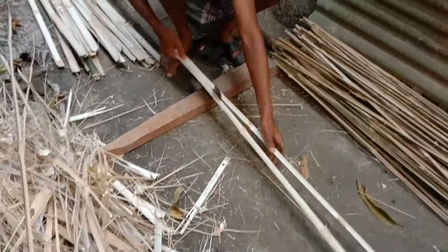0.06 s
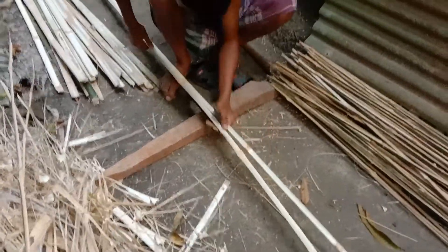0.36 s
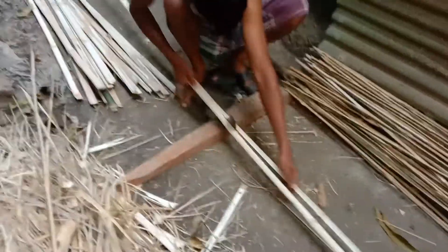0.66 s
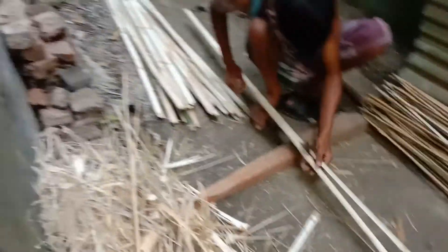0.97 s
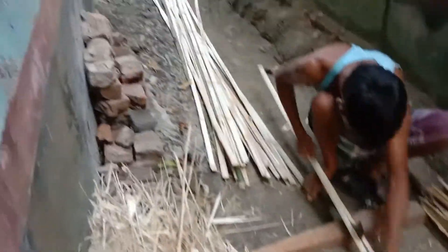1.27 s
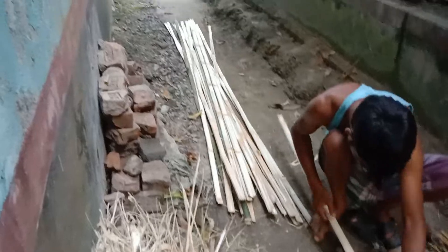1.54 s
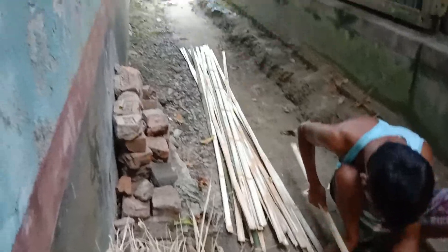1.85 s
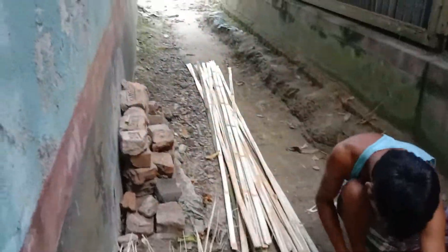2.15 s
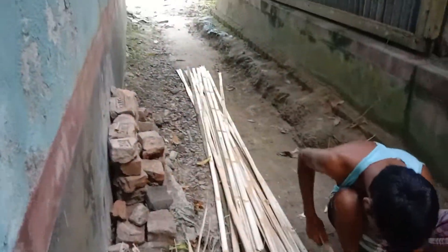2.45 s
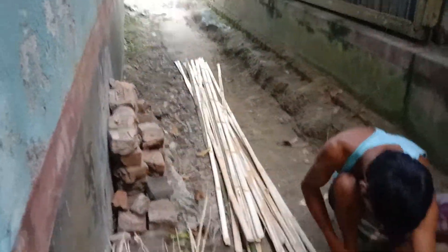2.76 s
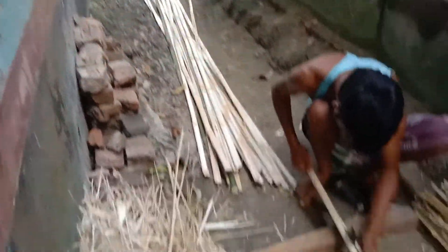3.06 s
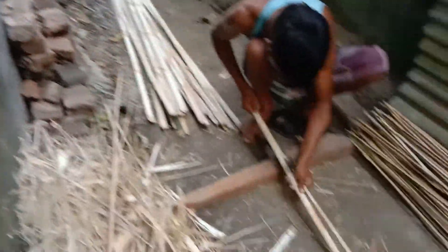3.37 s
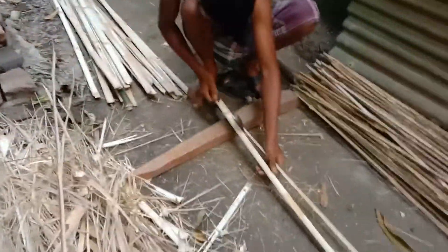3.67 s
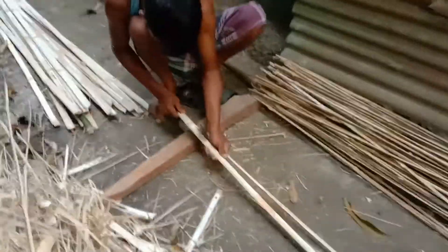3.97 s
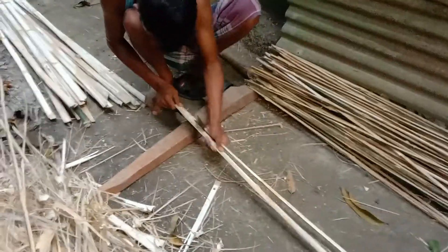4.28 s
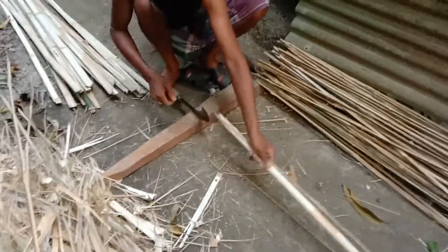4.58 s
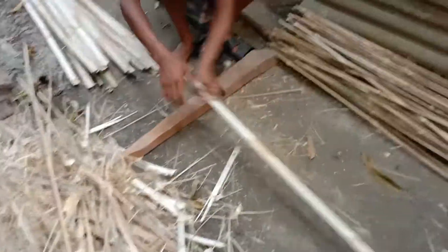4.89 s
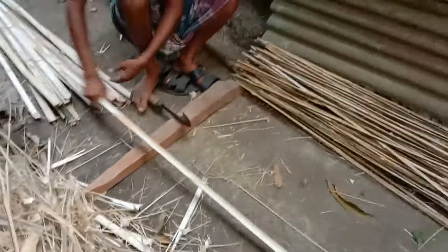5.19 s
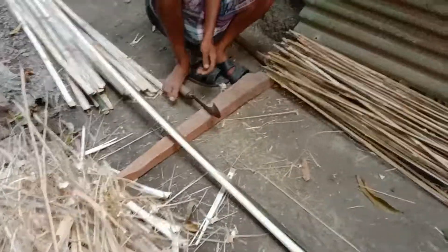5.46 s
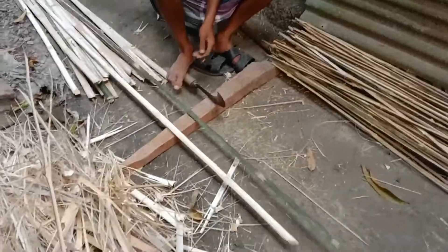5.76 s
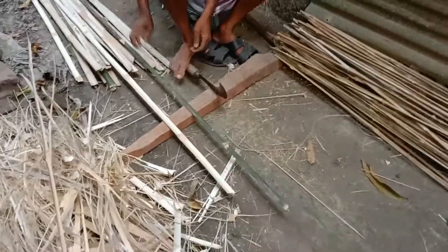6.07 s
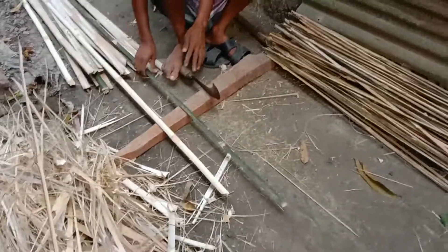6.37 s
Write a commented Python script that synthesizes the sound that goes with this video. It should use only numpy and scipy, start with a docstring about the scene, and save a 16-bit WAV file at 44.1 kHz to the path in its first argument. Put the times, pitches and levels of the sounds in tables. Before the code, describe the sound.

Close to the microphone, a bamboo strip is pulled over a fixed blade in eight uneven strokes, rubbing and squealing faintly as its fibres tear and snap. It is then tossed onto a pile and the next strip is dragged out, clacking and knocking on the ground. Further off in the walled yard chicks peep and another bird whistles briefly. Distant insects shrill throughout, and a faint low hum joins in the second half.

```python
"""A bamboo strip is pulled over a fixed blade in eight strokes, close to the microphone: it rubs,
sings faintly, and its fibres tear and snap. It is tossed onto a pile, and the next strip is dragged
out, knocking and clattering on the ground. Further off in the walled yard chicks peep and a second
bird whistles. Far insects shrill throughout, and a low hum comes up in the second half."""
import sys
import numpy as np
from scipy import signal
from scipy.fft import rfft, irfft
from scipy.io import wavfile
from scipy.ndimage import uniform_filter1d

SR = 44100
rng = np.random.default_rng(int(sys.argv[2]) if len(sys.argv) > 2 else 0)


def transcribe(signal):
    """Save signal, clipped to [-1, 1], as a 16-bit WAV file at the path in sys.argv[1]."""
    frames = np.atleast_2d(signal).T
    limited = np.clip(frames, -1, 1)
    pcm = np.round(limited * 32767).astype(np.int16)
    wavfile.write(sys.argv[1], SR, pcm)


N = 292383
TIME = np.arange(N) / SR


def amp(db):
    """Decibels to gain."""
    return 10 ** (np.asarray(db) / 20)


def unit(x):
    """Scales to rms 1."""
    return x / np.sqrt(np.mean(x ** 2) + 1e-20)


def read(points, hz):
    """A spectrum read on a log-frequency axis."""
    f, value = np.transpose(points)
    return np.interp(np.log(hz + 1), np.log(f + 1), value)


def add(mix, start, sound):
    """Mixes a sound in at a start in seconds."""
    part = mix[max(round(start * SR), 0):][:len(sound)]
    part += sound[:len(part)]


def colour(x, points):
    """Gives a steady sound a spectrum, at rms 1."""
    return unit(irfft(rfft(x) * amp(read(points, np.fft.rfftfreq(len(x), 1 / SR))), len(x)))


def swell(t, start, hold, rise, fall):
    """Attack, hold and release as a gain; rise and fall are the seconds for 20 dB."""
    below = np.maximum(start - t, 0) / rise + np.maximum(t - start - hold, 0) / fall
    return amp(-20 * np.minimum(below, 10))


def resonate(x, hz, width):
    """A resonance of gain 1 that can follow a pitch curve."""
    r = np.exp(-np.pi * width / SR)
    if np.ndim(hz) == 0:
        c = r * np.cos(2 * np.pi * hz / SR)
        return 2 * (1 - r) * signal.lfilter([1, -c], [1, -2 * c, r * r], x)
    turn = np.exp(2j * np.pi * np.cumsum(hz) / SR)
    return 2 * (turn * signal.lfilter([1 - r], [1, -r], x / turn + 1e-18)).real


def slips(per_s, spread_db, smooth):
    """Stick-slip: tiny clicks of very unequal size over smooth friction."""
    clicks = amp(spread_db * np.minimum(rng.exponential(1, N), 4)) * rng.choice([-1, 1], N)
    return unit(clicks * (rng.random(N) < per_s / SR)) + smooth * rng.standard_normal(N)


def patchy(x, frames, bins, depth_db=5):
    """Resonances come and go as the contact point travels along the strip."""
    spectra = signal.stft(x, nperseg=1024, noverlap=768)[2]
    patches = uniform_filter1d(rng.standard_normal(spectra.shape), bins, axis=0)
    patches = unit(uniform_filter1d(patches, frames, axis=1))
    return signal.istft(spectra * amp(depth_db * patches), nperseg=1024, noverlap=768)[1][:N]


# The blade bites. Each row: start, hold, rise and fall in seconds, then rub, fizz and drag in dB.
CUTS = [(0, 0.069, .02, 0.18, -36.5, -36, -69), (.578, 0.13, 0.028, 0.19, -35.5, -30.5, -60),
        (1.309, 0.16, 0.084, 0.12, -33.5, -29.5, -64), (1.986, 0.19, 0.025, 0.14, -32.5, -30.5, -42),
        (2.696, 0.072, 0.027, 0.3, -36, -30.5, -65.5), (3.554, 0.036, 0.15, 0.079, -38.5, -29, -68),
        (4.147, 0.023, 0.075, .13, -39.5, -30.5, -54), (4.449, 0.052, 0.027, .12, -33, -28, -47.5)]
# The strip slides uncut. Each row: start and hold in seconds, then rub, fizz and drag in dB.
SLIDES = [(0.43, 0.15, -43, -52, -66.5), (1.02, 0.23, -44.5, -51, -83), (1.532, 0.44, -40, -47, -63.5),
          (2.287, 0.27, -39.5, -49.5, -55.5), (2.9, 0.31, -69, -49, -66), (3.423, 0.071, -63, -38.5, -65.5),
          (3.771, 0.065, -40.5, -45, -57.5), (3.974, 0.081, -45, -58, -63), (4.247, 0.19, -60.5, -40, -72),
          (4.54, .15, -38, -58, -54.5), (5.115, .18, -45.5, -70, -64), (5.32, 0.23, -44, -67, -67.5),
          (5.59, 0.12, -50, -71, -76), (5.823, 0.18, -33.5, -71, -47), (6.098, 0.033, -43, -75, -64),
          (6.4, 0.047, -48.5, -83, -59)]
# Modes of a long strip. Each row: frequency and width in Hz, level in dB.
STRIP_MODES = [(1125, 18, 4.5), (1230, 33, -22), (1454, 17, -20), (1860, 35, -11), (2090, 30, -14),
               (2260, 24, 3), (2420, 70, 3.5), (2980, 44, 8), (3330, 64, 12.5), (3645, 95, 8)]
# Spectra of the rub, the tearing fizz and the dragging end. Each row: frequency in Hz, level in dB.
RUB_SPECTRUM = [(500, -42), (950, -17), (1400, 2), (2100, 3), (2500, 2), (3300, 2.5), (3750, 0.5),
                (4200, -15), (4700, 5.5), (5400, 7), (6500, 4), (7800, -17), (10500, -37), (13000, -60)]
FIZZ_SPECTRUM = [(1500, -32), (3300, -27), (4300, -19), (5200, -1), (6700, 12.5), (7900, -4), (10000, -2),
                 (11300, -4), (13000, 1.5), (15000, 5.5), (16000, -11)]
DRAG_SPECTRUM = [(30, -38), (110, -14.5), (180, -2.5), (280, 5), (450, -8.5), (700, -1.5), (1200, -3.5),
                 (3000, -57)]
def scraping(bright_hz=2700, firm_db=-37):
    """At the microphone, slips ring the strip and tearing fibres fizz; its far end drags on earth."""
    t = TIME[::64]
    moves = list(CUTS) + [(start, hold, 0.13, 0.18, *db) for start, hold, *db in SLIDES]
    power = sum(np.outer(amp(db), swell(t, start, hold, rise, fall)) ** 2
                for start, hold, rise, fall, *db in moves)
    rub_gain, fizz_gain, drag_gain = [np.interp(TIME, t, gain) for gain in np.sqrt(power)]
    grip = slips(per_s=1400, spread_db=3, smooth=0.76)
    ringing = unit(sum(amp(db) * resonate(grip, hz, width) for hz, width, db in STRIP_MODES))
    ring_db = np.interp(TIME, [3.6, 4.4, 5.0, 5.8], [-14.5, -32, -4, -3.5])  # most when held loosely
    rub = patchy(colour(grip, RUB_SPECTRUM), frames=16, bins=3) * amp(2.5) + ringing * amp(ring_db)
    dull = signal.sosfiltfilt(signal.butter(3, bright_hz, fs=SR, output="sos"), rub)
    brightness = np.minimum(rub_gain / amp(firm_db), 1) ** 0.18  # a light touch is duller
    rub = dull + (rub - dull) * brightness
    fizz = colour(slips(per_s=650, spread_db=4.5, smooth=1), FIZZ_SPECTRUM)
    drag = colour(slips(per_s=800, spread_db=7, smooth=1), DRAG_SPECTRUM)
    return rub * rub_gain + fizz * fizz_gain + patchy(drag, frames=14, bins=2) * drag_gain


# Spectra of the insects and the still air. Each row: frequency in Hz, level in dB.
INSECT_SPECTRUM = [(3900, -53), (4300, -23), (4800, 3.5), (5500, 4.5), (6400, 6), (7000, -4.5), (7700, -24),
                   (10300, -16), (11500, -40)]
AIR_SPECTRUM = [(20, -15), (45, -11), (90, -0.5), (200, -5), (500, -13.5), (1500, -19), (4300, -35),
                (5000, -3), (8000, 0), (10300, -5.5), (11500, -41), (16000, -40)]
# The chorus swells twice. Each row: time in seconds, level in dB.
CHORUS_LEVELS = [(0, -41.5), (1.3, -42.5), (2.5, -35.5), (3.2, -35.5), (4.0, -39.5), (4.75, -32.5),
                 (5.4, -30), (6.63, -33.5)]
def insects_and_air():
    """Far from the microphone, many insects merge into one shrill band above the still air."""
    chorus_db = np.interp(TIME, *np.transpose(CHORUS_LEVELS))
    insects = colour(rng.standard_normal(N), INSECT_SPECTRUM) * amp(chorus_db)
    return insects + colour(rng.standard_normal(N), AIR_SPECTRUM) * amp(-50.5)


CRACK_HZ = np.fft.rfftfreq(1024, 1 / SR)
def causal(gain_db, size=1024):
    """The sharpest impulse response that has these band gains."""
    cepstrum = irfft(np.log(amp(gain_db)))
    cepstrum[1:size // 2] *= 2
    cepstrum[size // 2 + 1:] = 0
    return irfft(np.exp(rfft(cepstrum)))


def crack(gain_db, t60, rattle_db, rattle_t60, rise):
    """A spike of splintering, then a weaker rattle of the strip; peak about 1."""
    t = np.arange(4096) / SR
    spike = amp(-60 * np.maximum(t - rise, 0) / t60)
    rattle = amp(rattle_db - 60 * t / rattle_t60)
    burst = rng.choice([-1, 1], len(t)) * (spike + rattle) * np.minimum(t / rise, 1) ** 2
    sound = signal.fftconvolve(burst, causal(gain_db))
    return sound / np.sqrt(uniform_filter1d(sound ** 2, size=64).max()) / 2


def small_snaps(per_s=55, most=32):
    """Lesser fibres give way at random while the blade bites; rows as in LOUD_SNAPS."""
    rows = []
    for start, hold, _, _, _, fizz_db, _ in CUTS:
        timing, strength = rng.random((most, 2)).T
        delays = (np.arange(most) + timing) / per_s
        levels = fizz_db + 14 + strength
        rows += [(start + delay, db, -20.5) for delay, db in zip(delays, levels) if delay < hold]
    return rows


# The loudest fibres breaking. Each row: start in seconds, level and woody body in relative dB.
LOUD_SNAPS = [(.576, -7, -28), (.587, -6, -13.5), (.612, -4.5, -24), (.634, -4, -13), (.667, -2.5, -30),
              (.7, -10.5, -12), (1.403, -2, -9.5), (1.468, -2, -24), (1.985, -1, -6), (1.995, -9, -32),
              (2.245, -11.5, -21), (2.666, -13, -10), (2.688, 0, -33), (2.711, -1, -22), (3.571, -5, -24),
              (4.144, -2.5, -7.5), (4.478, -4.5, -21)]
def snaps():
    """Fibres break at the blade with a bright crack, close to the microphone."""
    out = np.zeros(N)
    tilt_db = read([(500, -12), (1100, 2.5), (7000, 1.5), (9500, 0)], CRACK_HZ)
    body = read([(3600, 0.76), (5000, 0.21)], CRACK_HZ)
    for start, db, body_db in list(LOUD_SNAPS) + small_snaps():
        add(out, start, amp(db - 2) * fibre_snap(tilt_db + body * (body_db + 18)))
    return out


# Spectrum of a breaking fibre. Each row: frequency in Hz, level in dB.
SNAP_SPECTRUM = [(120, -73), (200, -41), (401, -13), (806, -13), (1080, -4.5), (1530, -14.5), (2250, -16),
                 (2510, -13), (2960, -5), (4040, -10), (5420, 2.5), (7010, -2.5), (8420, -16), (14900, 0.5),
                 (16000, -11.5)]
def fibre_snap(tint_db):
    """One fibre splinters and leaves the strip rattling."""
    spectrum = read(SNAP_SPECTRUM, CRACK_HZ) + tint_db
    return crack(spectrum, t60=0.0065, rattle_db=-4.5, rattle_t60=0.095, rise=0.0017)


def slip_tone(samples, hz, width, harmonics):
    """A short tone whose pitch wanders, fading in and out."""
    wander = np.sqrt(2 * np.pi * width / SR) * rng.standard_normal(samples)
    phase = np.cumsum(2 * np.pi * hz / SR + wander)
    tone = unit(sum(unit(resonate(np.sin(k * phase), k * hz, 50)) for k in harmonics))
    return tone * signal.windows.tukey(samples, 0.4)


# Squeals and groans. Each row: start and end in seconds, pitch and width in Hz, level in dB.
SQUEALS = [(0.0193, 0.224, 2250, 110, -48.5), (.585, .74, 560, 143, -48.5), (1.48, 1.61, 230, 52, -53),
           (3.24, 3.39, 310, 48, -55), (1.286, 1.63, 993, 5.8, -36.5), (1.1, 1.523, 1386, 14, -45.5),
           (2.24, 2.444, 846, 66, -41.5), (2.461, 2.67, 550, 13, -53.5), (3.5, 4.405, 2270, 51, -55.5),
           (4.436, 4.518, 1083, 32, -36.5), (4.431, 4.547, 2966, 18, -35), (4.413, 4.59, 670, 47, -49),
           (4.583, 4.76, 3280, 7.5, -40.5)]
def squeals():
    """Close by, the strip squeals or groans where it slips evenly."""
    out = np.zeros(N)
    for start, end, hz, width, db in SQUEALS:
        add(out, start, amp(db) * slip_tone(int((end - start) * SR), hz, width, harmonics=[1]))
    add(out, 6, amp(-47) * slip_tone(64, hz=443, width=2, harmonics=range(2, 6)))  # one faint tick
    return out


def peep(length, first_hz, last_hz):
    """A slightly hoarse whistle that slides down and levels out."""
    progress = np.linspace(0, 1, int(length * SR))
    waver = 1 + 0.01 * unit(uniform_filter1d(rng.standard_normal(len(progress)), size=50))
    glide = np.interp(progress, [0, 0.25, 0.6, 0.8, 1], [0, 0.25, 0.68, 0.92, 1])
    hz = (first_hz + (last_hz - first_hz) * glide) * waver
    throat_db = read([(3100, 1), (4100, -2), (4900, 3), (5900, 7)], hz)
    return amp(throat_db) * signal.windows.tukey(len(hz), 0.25) * np.sin(2 * np.pi * np.cumsum(hz) / SR)


# Chick calls. Each row: start and length in seconds, last pitch in Hz, level in relative dB.
PEEPS = [(0.235, .112, 2700, -41), (0.456, 0.073, 3310, -43.5), (0.901, 0.068, 3200, -47),
         (1.031, 0.083, 3090, -45.5), (1.187, 0.071, 3200, -42), (1.489, .064, 3250, -43),
         (1.649, 0.065, 3270, -43), (1.844, 0.097, 3370, -38.5), (2.312, 0.065, 3260, -43),
         (2.52, .072, 3130, -44), (2.833, 0.057, 3320, -39), (2.972, .062, 3180, -42),
         (3.122, 0.069, 3050, -41), (3.288, 0.085, 2960, -41), (3.456, .082, 3160, -38),
         (3.682, 0.097, 3390, -38), (3.923, 0.061, 3310, -49.5)]
def chicks(first_hz=6060):
    """Further off in the yard, the chicks repeat one falling peep."""
    out = np.zeros(N)
    for start, length, last_hz, db in PEEPS:
        add(out, start, amp(db) * peep(length, first_hz, last_hz))
    return out


# Long slides. Each row: start, hold, rise and fall in seconds, first pitch in Hz, first level in dB.
HOLLOW_NOTES = [(0.396, 0.31, 0.059, 0.11, 1210, -40.5), (0.998, 2.84, 0.25, 0.83, 1450, -41)]
def hollow_notes(rest_hz=1071, sink_s=0.39, fade_db_per_s=1.57):
    """A long slide sounds a hollow note close by, sinking as the strip settles."""
    out = np.zeros(N)
    for start, hold, rise, fall, first_hz, db in HOLLOW_NOTES:
        age = np.maximum(TIME - start, 0)
        hz = rest_hz + (first_hz - rest_hz) * np.exp(-age / sink_s)
        note = unit(resonate(resonate(rng.standard_normal(N), hz, 166), hz, 230))
        out += note * swell(TIME, start, hold, rise, fall) * amp(db - fade_db_per_s * age)
    return out


def hum():
    """A low hum swells in the background, then stays on more quietly."""
    crest = amp(-57.5) * swell(TIME, start=4, hold=0.74, rise=0.8, fall=0.6)
    steady = amp(-64) * swell(TIME, start=4, hold=N / SR, rise=0.8, fall=0.6)
    drone = unit(resonate(resonate(rng.standard_normal(N), 93.3, 6.6), 78, 60))
    return drone * np.maximum(crest, steady)


# Spectrum of strip striking strip. Each row: frequency in Hz, level in dB.
CLACK_SPECTRUM = [(150, -103), (250, -19.5), (589, -18.5), (1480, -5.5), (1700, -8), (2440, -4),
                  (2950, 0.5), (3320, -3), (3940, -14), (4220, -8.5), (5550, -0.5), (6260, -6.5),
                  (8100, -34.5), (11600, -38.5), (15000, -75)]
# Strikes. Each row: start in seconds, level, woody body and brittle top in relative dB, ring in seconds.
CLACKS = [(3.794, -6.5, -6, -52, 0.0053), (4.815, -12, -27, -36, 0.011), (4.983, -8, -44, -28, 0.0072),
          (5.327, -16, -24.5, -42.5, 0.11), (5.462, -20.5, -30, -45, .05),
          (5.7869, -0.5, -24.5, -38, 0.037), (5.825, -5, -23, -41, .009), (5.835, -3.5, -24, -50, 0.04),
          (5.9156, -7, -35, -58, 0.0083), (5.934, -6, -28, -54, 0.0064), (5.939, -2.5, -31, -69, 0.022),
          (6.062, -16, -36, -40, .006), (6.106, -11, -32, -51, .017), (6.119, -9, -30.5, -50, 0.0034),
          (6.338, -17.5, -32, -54, 0.027), (6.4659, -12.5, -12.5, -30, 0.014),
          (6.531, -16.5, -39, -57, 0.018)]
def clacks():
    """Strips clack on each other at the nearby pile, hard tips brighter than flat sides."""
    out = np.zeros(N)
    body = read([(1900, 1), (3000, 0.056)], CRACK_HZ)
    top = read([(7000, 0), (9500, 1)], CRACK_HZ)
    for start, db, body_db, top_db, ring in CLACKS:
        spectrum = read(CLACK_SPECTRUM, CRACK_HZ) + body * (body_db + 19.5) + top * (top_db + 44)
        clack = crack(spectrum, t60=ring, rattle_db=-14, rattle_t60=0.072, rise=0.00071)
        add(out, start, amp(db - 1.5) * clack)
    return out


def swing(t, hz, sink_cycles, loss_db, rest_share=0.072, rise_cycles=0.93):
    """Quick bending waves arrive before slow ones: swings of falling pitch, strongest at t = 0."""
    sinking = sink_cycles * np.log(np.maximum(1 + t * hz / sink_cycles, 1e-3))
    turns = rest_share * hz * t + (1 - rest_share) * sinking
    onset = np.exp(-(np.minimum(turns, 0) / rise_cycles) ** 2)
    return np.cos(2 * np.pi * turns) * onset * amp(-loss_db * np.maximum(turns, 0) ** 1.28)


# Dull blows. Each row: time in seconds, peak in dB, pitch in Hz, swings for the pitch to sink to
# about 1/e, loss in the first swing in dB, grit in dB against the peak.
KNOCKS = [(3.83, -20, 600, 1.6, 3.5, -5), (4.047, -28.5, 145, 3, 3, -7), (4.816, -23.5, 990, 2.2, 9, -6),
          (5.07, -21, 564, 1.9, 4, -1.5), (5.162, -16.5, 406, 1.37, 8.5, -13),
          (5.762, -10.5, 636, 1.1, 5, -16), (5.989, -10, 565, 0.86, 11, -19),
          (6.48, -14, 740, 1.25, 9.5, -15), (6.6085, -4, 910, 1.2, 8.5, -15.5)]
def knocks(lead_s=0.01, grit_t60=0.066):
    """Close by, heavily damped dull blows, each with a scuff of grit."""
    out, t = np.zeros(N), np.arange(SR // 8) / SR
    for start, db, hz, sink_cycles, loss_db, grit_db in KNOCKS:
        grit = rng.standard_normal(len(t)) * amp(-60 * t / grit_t60)
        band = signal.butter(1, [hz / 2, hz * 2], "bandpass", fs=SR, output="sos")
        scuff = signal.sosfilt(band, signal.sosfilt(band, grit))
        add(out, start, amp(db + grit_db) * scuff / abs(scuff).max())
        add(out, start - lead_s, amp(db) * swing(t - lead_s, hz, sink_cycles, loss_db))
    return out


# Bird calls. Each row: start and length in seconds, first pitch in Hz, level in relative dB.
WHISTLES = [(4.207, 0.027, 4860, -41), (5.134, 0.12, 5610, -38), (5.382, 0.057, 4860, -37)]
def second_bird(sag_hz_per_s=6500):
    """Away from the microphone, another bird whistles on a flatter note."""
    out = np.zeros(N)
    for start, length, hz, db in WHISTLES:
        add(out, start, amp(db) * peep(length, hz, hz - sag_hz_per_s * length))
    return out


# Spectrum of smooth bamboo skin sliding on skin. Each row: frequency in Hz, level in dB.
SWISH_SPECTRUM = [(1000, -40), (1400, -3), (2500, -4), (3500, -4), (4200, -24), (7000, -6), (9500, 4),
                  (11500, -5), (15000, -20)]
def swish():
    """The next strip slides out of the nearby pile with one dry hiss."""
    # The negative hold overlaps rise and fall, which lowers the crest.
    gain = amp(-44) * swell(TIME, start=5.5, hold=-0.16, rise=0.18, fall=0.3)
    return gain * colour(rng.standard_normal(N), SWISH_SPECTRUM)


# Decay of the yard. Each row: frequency in Hz, seconds to fall 60 dB.
YARD_DECAY = [(150, 0.22), (700, 0.12), (2500, 0.27), (6000, 0.28), (15000, 0.038)]
def yard(x, echoes_per_s=3000, first_echo_s=0.005):
    """Short scattered echoes reach the microphone from the walls and the tin fence."""
    n = SR // 2
    taps = rng.standard_normal(n) * (rng.random(n) < echoes_per_s / SR) * (TIME[:n] > first_echo_s)
    hz, t, spectra = signal.stft(taps, SR, nperseg=256)
    decay = amp(-60 * t / read(YARD_DECAY, hz)[:, None])
    tail = signal.istft(spectra * decay, SR, nperseg=256)[1]
    return signal.fftconvolve(x, tail / np.linalg.norm(tail))[:N]


def scene():
    """One microphone beside the work; the birds further off, heard partly by way of the walls."""
    cracks, thuds, birds = snaps() + clacks(), knocks(), chicks() + second_bird()
    work = scraping() + squeals() + hollow_notes() + swish() + cracks + thuds
    echoes = yard(amp(-11.5) * cracks + amp(-21) * thuds + amp(2.5) * birds)
    return (work + birds + echoes + insects_and_air() + hum())[None]


def record(dry):
    """The level dips briefly before the loudest clack; peaks clip and the treble ends at 15.8 kHz."""
    dip_db = np.where((TIME > 5.772) & (TIME < 5.786), -23.0, 0.0)
    clipped = np.clip(dry * amp(uniform_filter1d(dip_db, size=40)), -1, 1)
    lowpass = signal.firwin(511, 15800, window=("kaiser", 9), fs=SR)
    return signal.oaconvolve(clipped, lowpass[None], "same")


dry = scene()
out = record(dry)
transcribe(out)
```